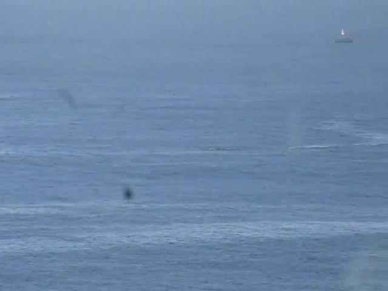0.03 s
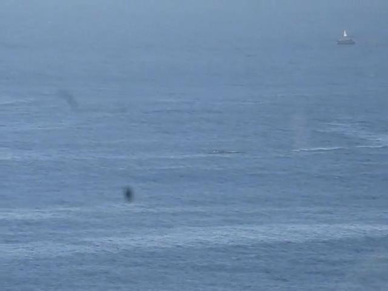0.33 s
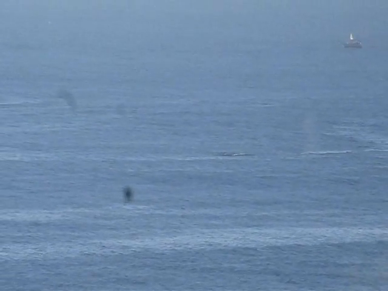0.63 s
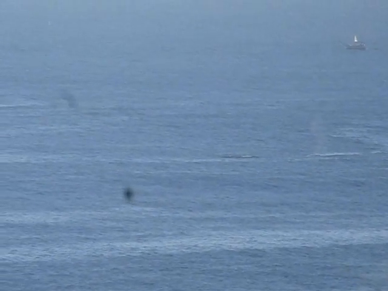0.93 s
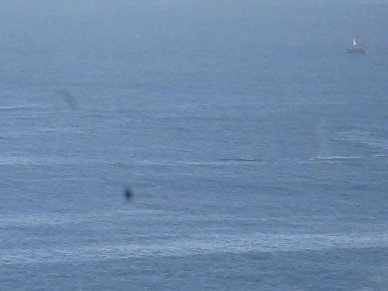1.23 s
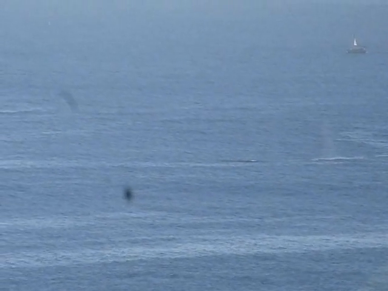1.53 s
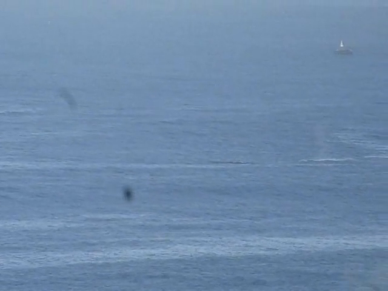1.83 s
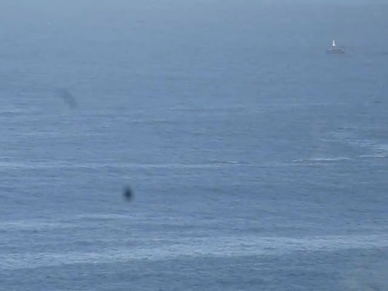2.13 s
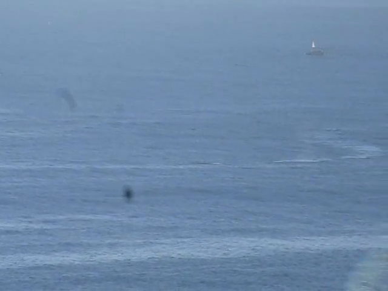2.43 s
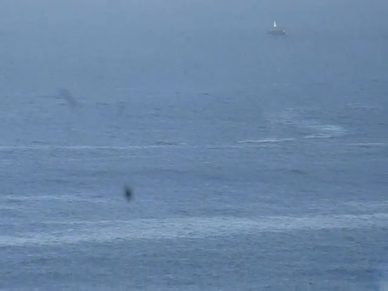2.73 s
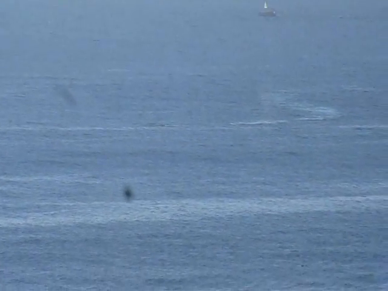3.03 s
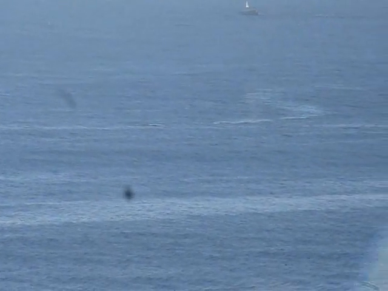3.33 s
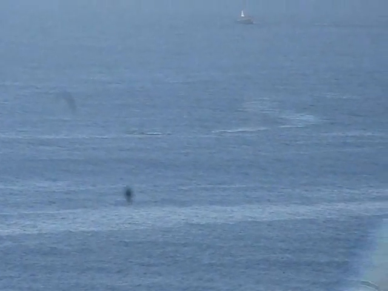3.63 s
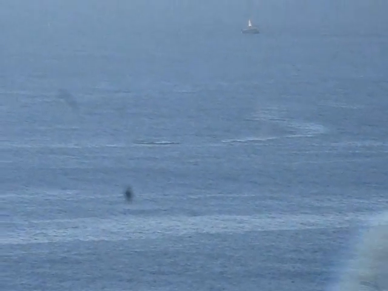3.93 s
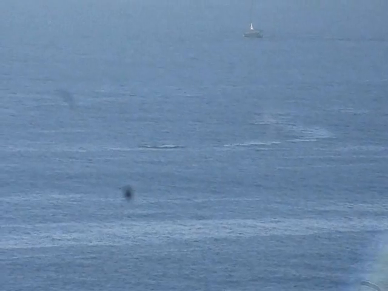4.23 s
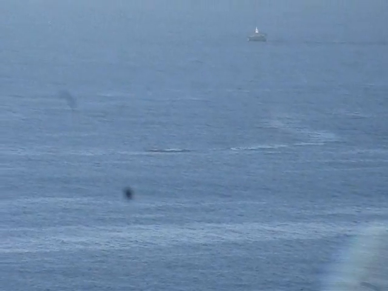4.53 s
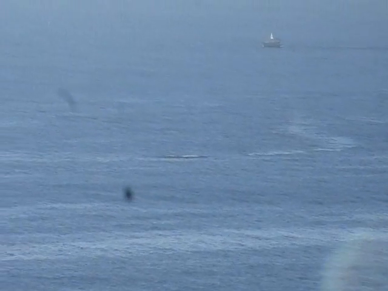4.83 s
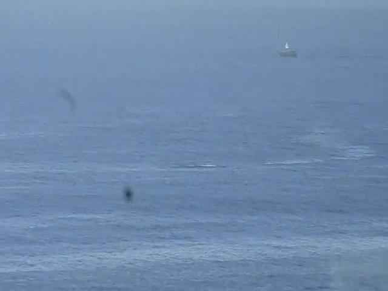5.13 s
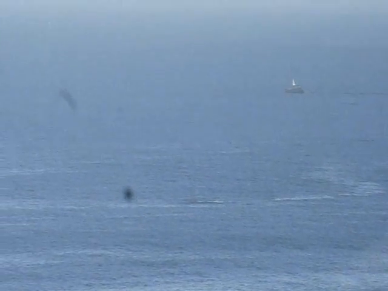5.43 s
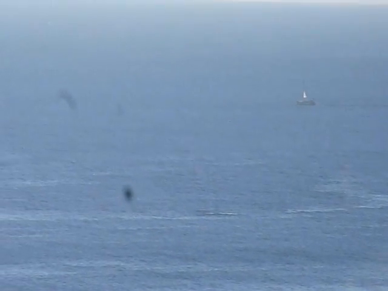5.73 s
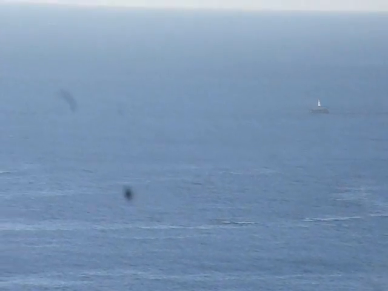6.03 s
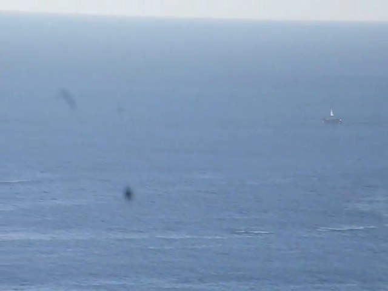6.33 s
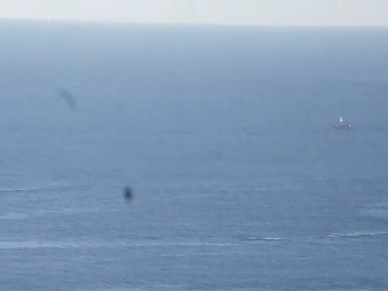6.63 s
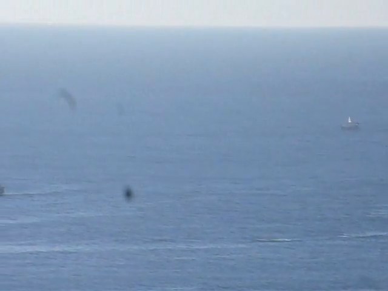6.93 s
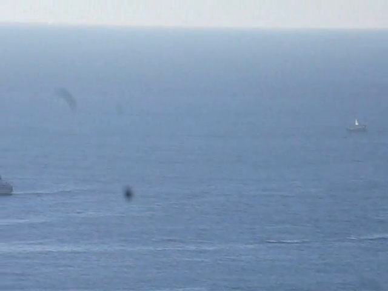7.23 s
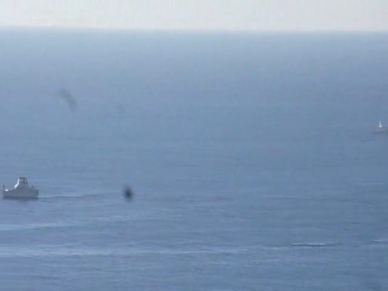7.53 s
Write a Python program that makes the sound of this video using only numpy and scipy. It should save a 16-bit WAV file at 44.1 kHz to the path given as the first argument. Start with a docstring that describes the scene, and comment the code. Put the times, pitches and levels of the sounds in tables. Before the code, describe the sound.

Distant sea surf rumbles and hisses, with breakers booming softly over the faint low drone of a boat engine.

```python
"""Surf far below a coastal lookout: breakers roar, foam washes and hisses, then the sea settles.
The sea is six noise bands that follow the swell; single breakers add rumble, boom and hollow roar.
Underneath, a low sine drone like a distant boat engine sags in pitch and level, then climbs back.
One microphone, narrow band."""
import sys
import numpy as np
from scipy import signal
from scipy.fft import rfft, irfft
from scipy.io import wavfile
from scipy.ndimage import uniform_filter1d

SR = 44100
rng = np.random.default_rng(int(sys.argv[2]) if len(sys.argv) > 2 else 0)


def wrap_up_sound(samples):
    """Save the sound to the file named by the first command line argument, as 16-bit audio."""
    columns = np.atleast_2d(samples).T
    # keep every value between -1 and 1, then stretch to whole-number steps
    tamed = np.clip(columns, -1, 1)
    steps = np.round(tamed * 32767).astype(np.int16)
    wavfile.write(sys.argv[1], SR, steps)


N = 335160

# sea spectrum, bass: freq_hz, relative_density_db
SEA_BASS = [(20, -28), (31, -25), (42, -9), (53, -11.5), (70, -4.5), (115, 1), (200, 0), (315, -0.5),
            (400, -3.5)]
# sea spectrum, mids and treble: freq_hz, relative_density_db
SEA_UPPER = [(540, -3), (740, -7), (1000, -9.5), (1400, -10), (1800, -13), (2200, -13.5), (2600, -18),
             (3100, -20.5), (3750, -21), (4600, -30), (5400, -31), (6000, -36), (6400, -43), (7000, -55)]
# running white water, used relative to its mean: time_s, level_db
WHITE_WATER = [(0.0, -35.5), (0.7, -35), (1.6, -34.5), (2.8, -35.0), (3.35, -35.5), (3.8, -36), (4.4, -36),
               (5.3, -39.5), (6.2, -40), (7.6, -42)]
# collapsing breakers: crest_s, boom_db, hollow_db
BREAKER_CRESTS = [(1.42, -33.5, -48), (1.72, -38, -38), (2.06, -35, -43), (2.42, -33.5, -37),
                  (3.1, -34, -37.5), (3.38, -31.5, -33.5), (4.2, -37, -53), (4.65, -34.5, -43.5),
                  (5.22, -39, -42), (5.88, -37.5, -56), (6.9, -37, -44)]
# engine firing tone: time_s, pitch_hz, peak_db
ENGINE_TONE = [(0, 79, -45), (.3, 79, -38), (1.7, 74, -43.5), (2.6, 70, -53), (4.7, 59, -56),
               (5.15, 62, -46), (5.9, 75, -42), (6.55, 79, -37.7), (7.6, 76, -40)]


def surf(foam_lag_s=0.15):
    """Breakers rumble, boom and roar over the wash; foam bursts just after the water runs in."""
    swell_db, = curves(WHITE_WATER)
    surge_db = swell_db - swell_db.mean()
    time_s = np.arange(N) / SR
    late_surge_db = np.interp(time_s - foam_lag_s, time_s, surge_db)
    crash, roar = breakers()
    rumble_gain = np.hypot(gain(-45.5 + 0.5 * surge_db), gain(-15) * crash)
    boom_gain = np.hypot(gain(-35.5 + 0.55 * surge_db), crash)
    shore_gain = gain(-37.5 + 0.32 * surge_db)
    hollow_gain = np.hypot(gain(-41 + 1.62 * surge_db), roar)
    wash_gain = gain(-35.5 + 0.86 * surge_db)
    foam_gain = gain(-42.4 + 1.2 * late_surge_db)
    rumble = rumble_gain * water(15, 85, patch_db=0.5, patch_frames=30, patch_bins=3)
    boom = boom_gain * water(90, 356, patch_db=0.2, patch_frames=24, patch_bins=5)
    far_shore = shore_gain * water(320, 750)
    hollow = hollow_gain * water(474, 620)
    wash = wash_gain * water(740, 2210, patch_db=0.37, patch_frames=16, patch_bins=14)
    foam = foam_gain * water(2164, 7500, patch_db=0.6, patch_frames=12, patch_bins=24)
    return rumble + boom + far_shore + hollow + wash + foam


def breakers(build_s=0.086, collapse_s=0.18):
    """Boom and hollow-roar amplitudes: each breaker builds fast and dies away; powers add."""
    time_s = np.arange(N) / SR
    power = np.zeros((2, N))
    for crest_s, boom_db, hollow_db in BREAKER_CRESTS:
        width_s = np.where(time_s < crest_s, build_s, collapse_s)
        envelope = np.exp(-((time_s - crest_s) / width_s) ** 2)
        power += gain([[boom_db], [hollow_db]]) ** 2 * envelope
    return np.sqrt(power)


def water(low_hz, high_hz, patch_db=0, patch_frames=1, patch_bins=1):
    """Unit-rms band of sea noise; patches swell and fade as different stretches of shore break."""
    real, imag, patches = rng.standard_normal((3, N // 256 + 5, 513))  # frames by bins
    patches = uniform_filter1d(patches, patch_frames, axis=0)
    patches = unit_rms(uniform_filter1d(patches, patch_bins, axis=1))
    field = (real + 1j * imag) * gain(patch_db * patches)
    noise = signal.istft(field.T, nperseg=1024, noverlap=768)[1][:N]
    freq_hz = np.fft.rfftfreq(N, 1 / SR) + 1
    band = 1 / np.sqrt((1 + (low_hz / freq_hz) ** 10) * (1 + (freq_hz / high_hz) ** 10))
    sea_hz, sea_db = np.transpose(SEA_BASS + SEA_UPPER)
    colour_db = np.interp(np.log(freq_hz + 1), np.log(sea_hz), sea_db)
    return unit_rms(irfft(rfft(noise) * band * gain(colour_db), N))


def engine(waver_db=1.5, wander_ratio=0.0037):
    """Only the firing tone carries over the water; moving air makes it waver."""
    pitch_hz, peak_db = curves(ENGINE_TONE)
    phase_turns = np.cumsum(pitch_hz * (1 + wander_ratio * drift(rate_hz=3.6))) / SR
    return gain(peak_db + waver_db * drift(rate_hz=5)) * np.sin(2 * np.pi * phase_turns)


def drift(rate_hz):
    """Slow unit-rms noise, rolled off above rate_hz."""
    freq_hz = np.fft.rfftfreq(N, 1 / SR)
    lowpass = np.exp(-(freq_hz / rate_hz) ** 2)
    return unit_rms(irfft(rfft(rng.standard_normal(N)) * lowpass, N))


def curves(rows):
    """One per-sample curve for each column after time_s."""
    time_s, *columns = np.transpose(rows)
    return [np.interp(np.arange(N) / SR, time_s, column) for column in columns]


def gain(level_db):
    """Decibels to amplitude."""
    return 10 ** (np.asarray(level_db) / 20)


def unit_rms(x):
    """Scale to rms 1."""
    return x / np.sqrt(np.mean(x ** 2) + 1e-20)


def scene():
    """Surf and engine at one distant microphone."""
    return (surf() + engine())[None]


def record(dry, cutoff_hz=7100):
    """The recorder's steep low-pass."""
    taps = signal.firwin(1023, cutoff_hz, window=("kaiser", 9), fs=SR)
    return signal.oaconvolve(dry, taps[None], "same")


dry = scene()
out = record(dry)
wrap_up_sound(out)
```